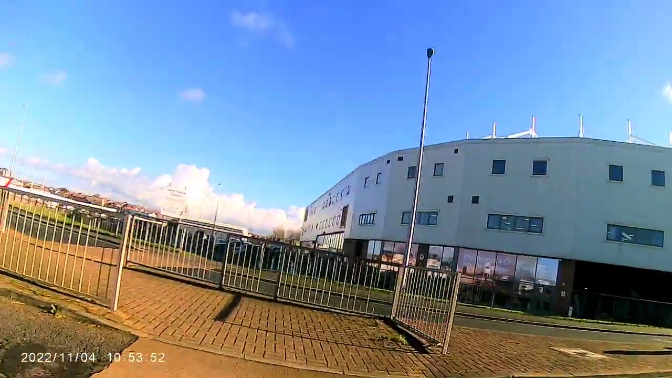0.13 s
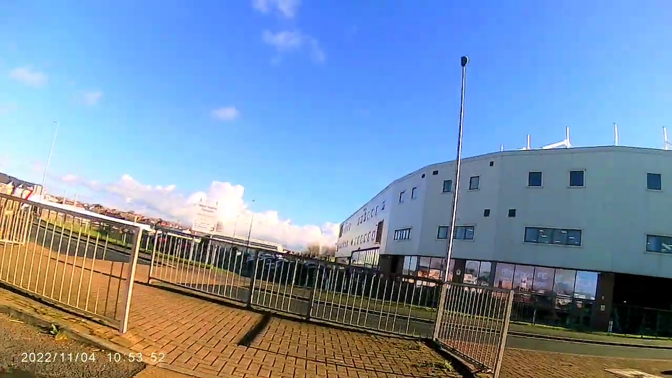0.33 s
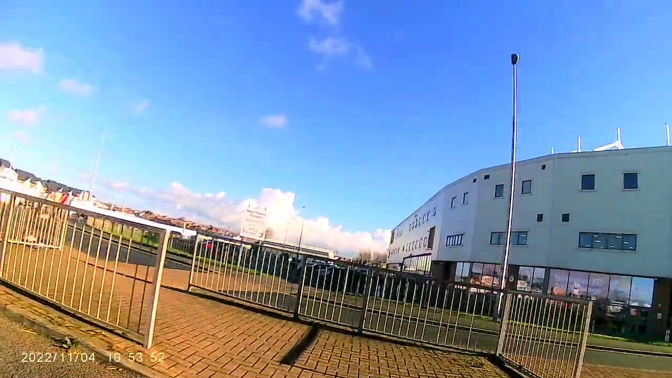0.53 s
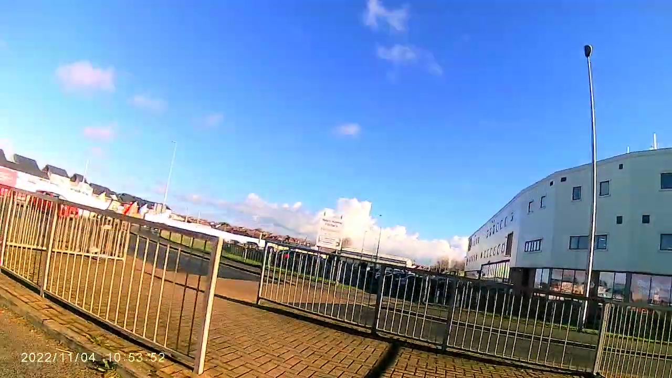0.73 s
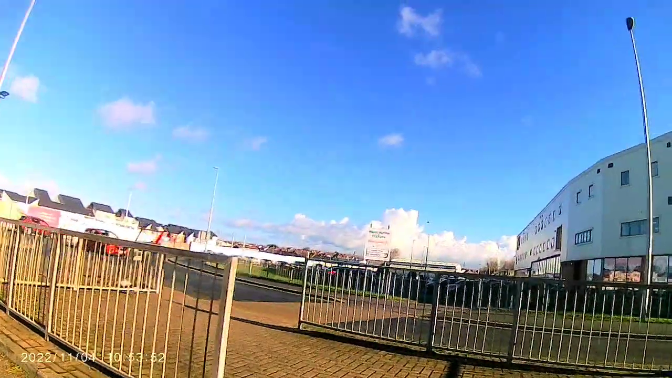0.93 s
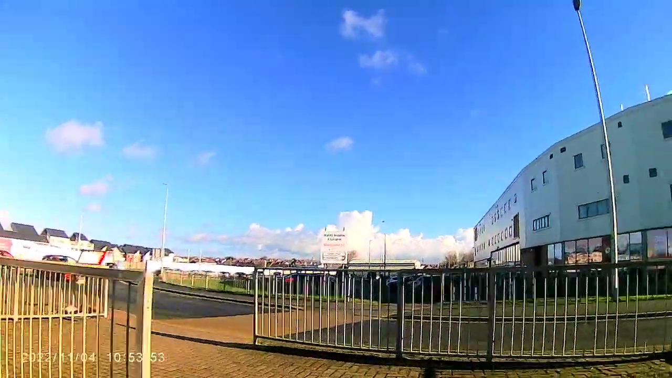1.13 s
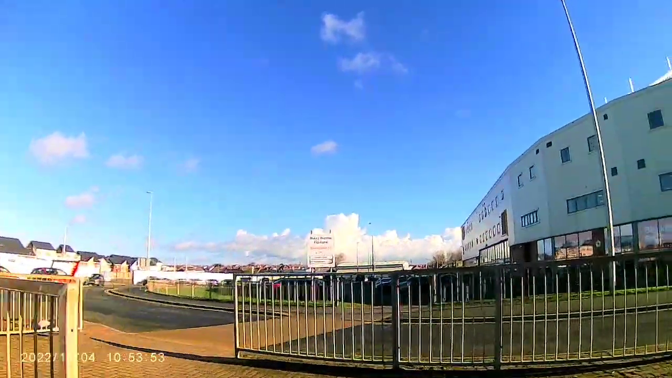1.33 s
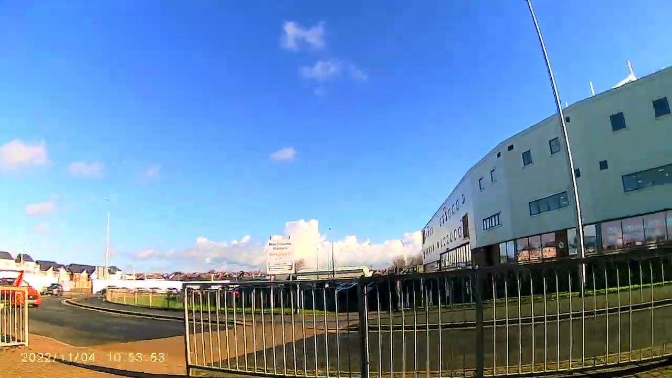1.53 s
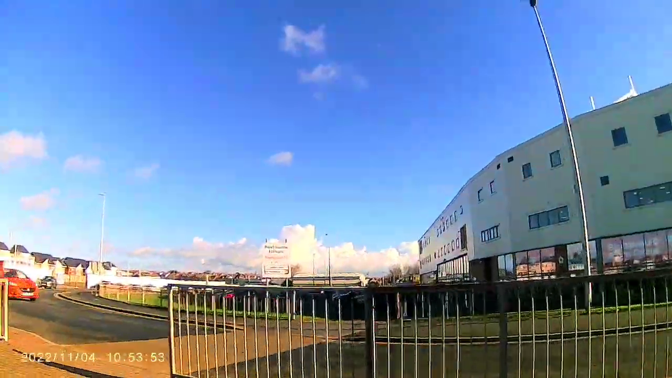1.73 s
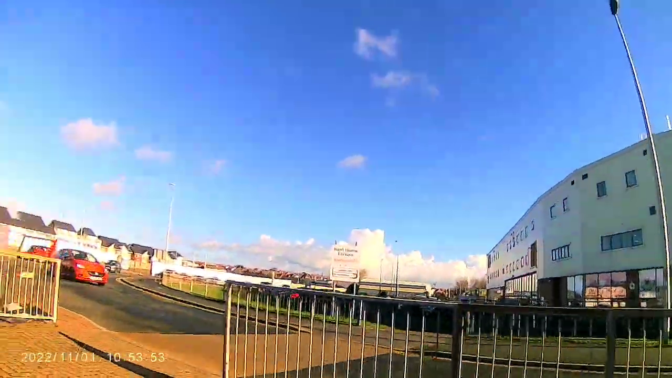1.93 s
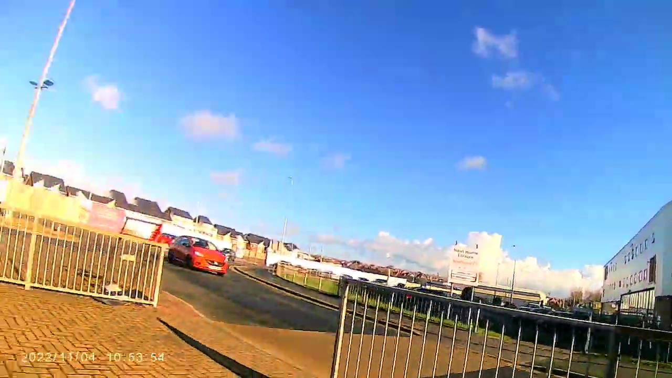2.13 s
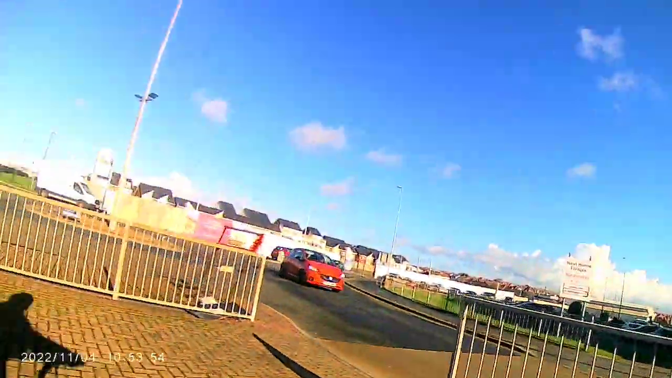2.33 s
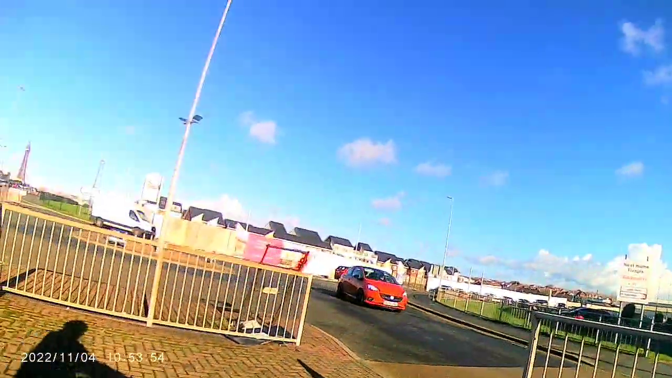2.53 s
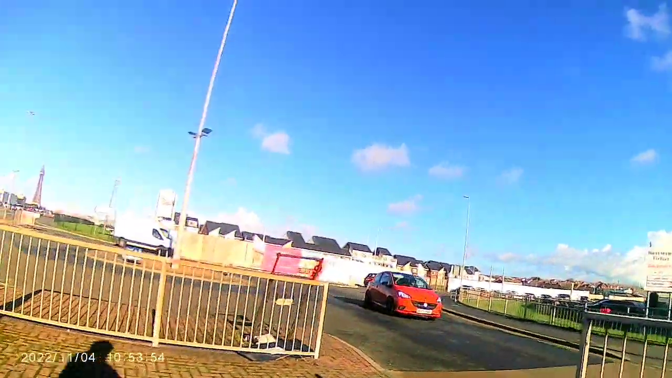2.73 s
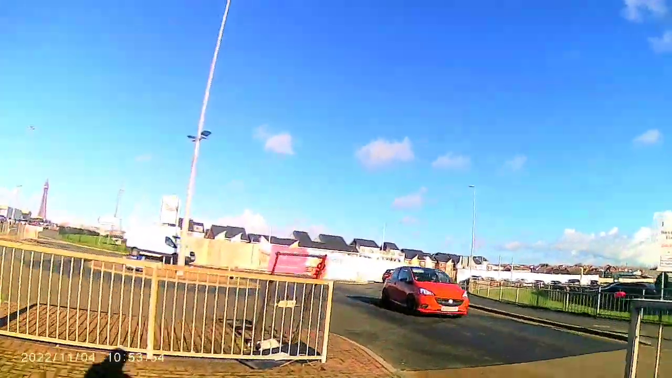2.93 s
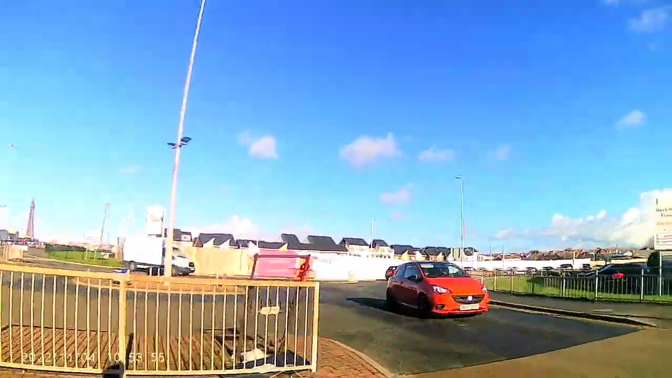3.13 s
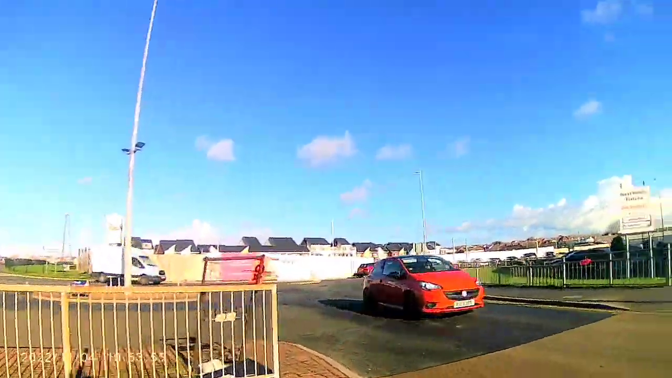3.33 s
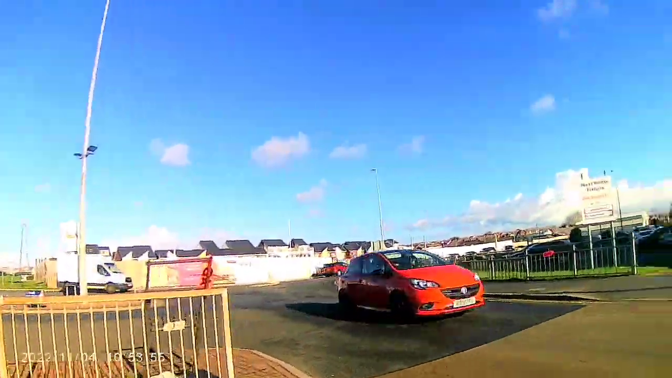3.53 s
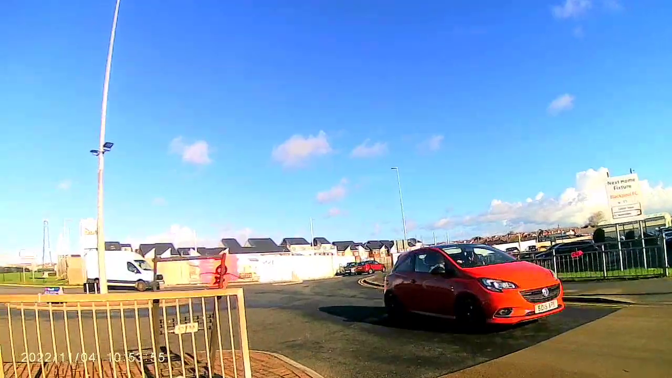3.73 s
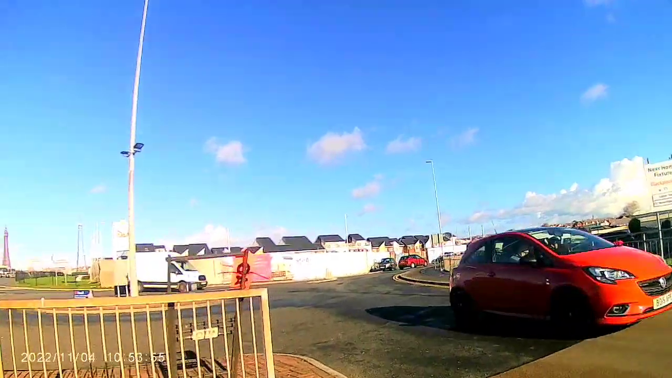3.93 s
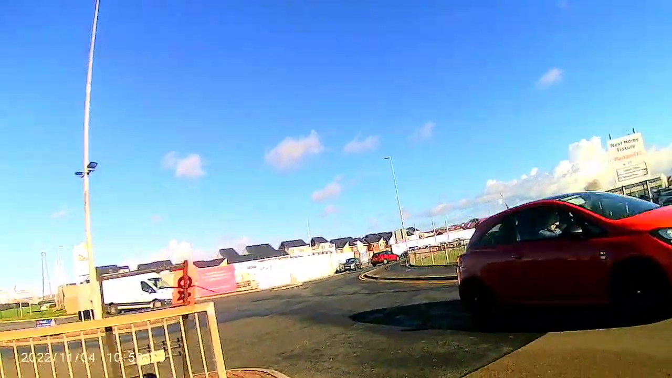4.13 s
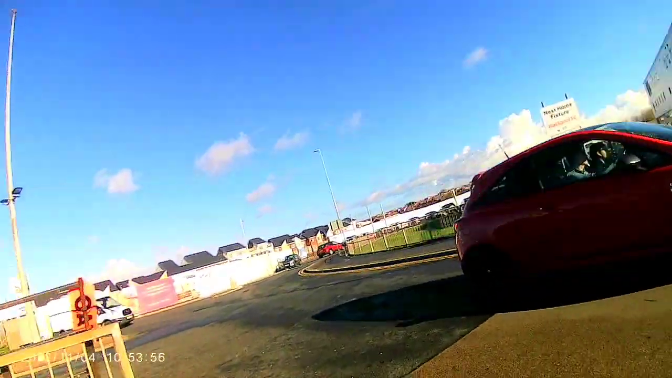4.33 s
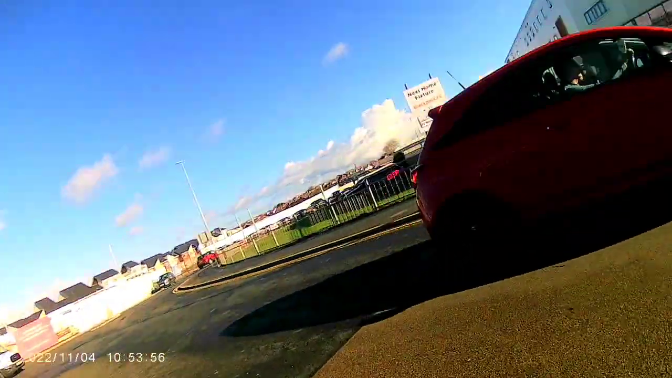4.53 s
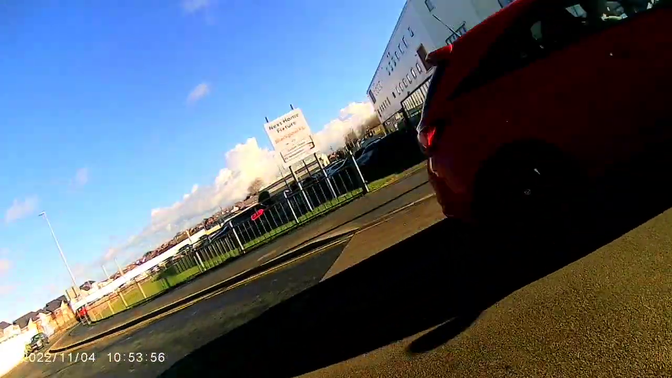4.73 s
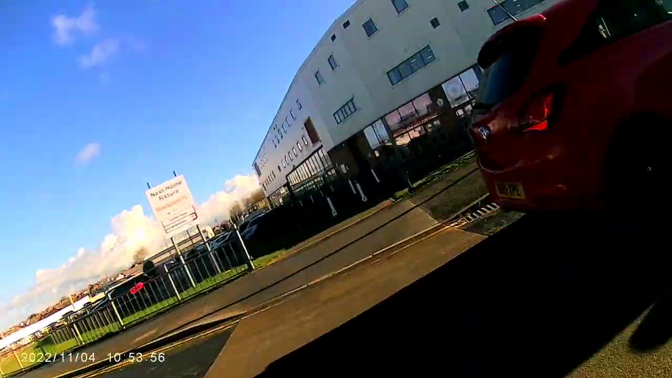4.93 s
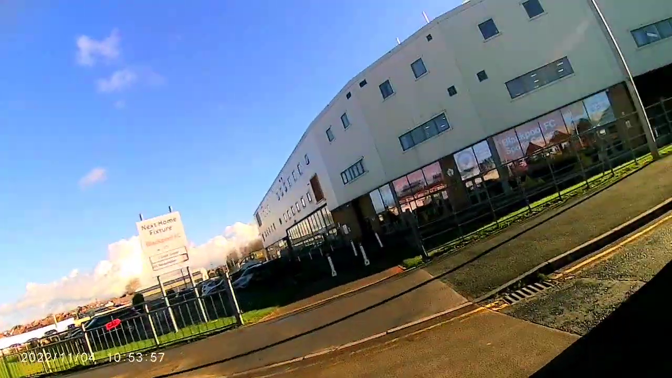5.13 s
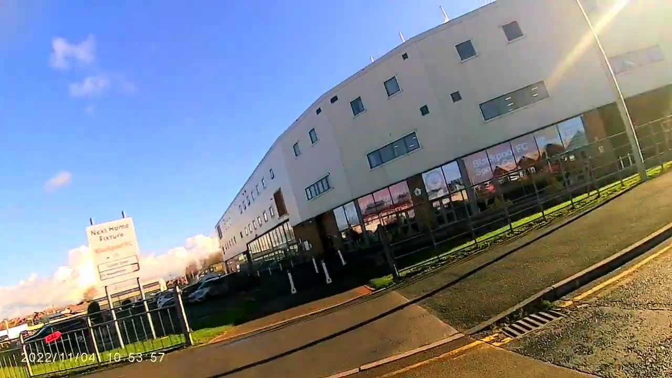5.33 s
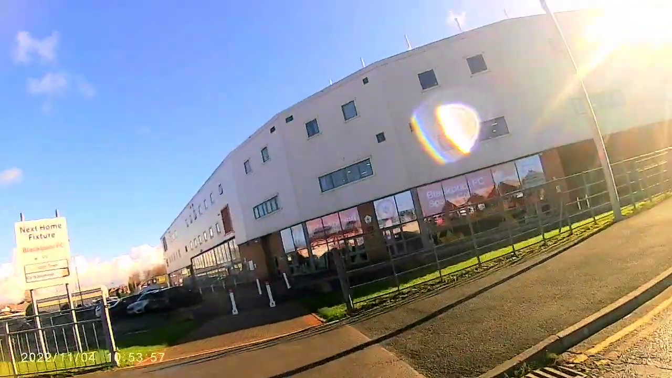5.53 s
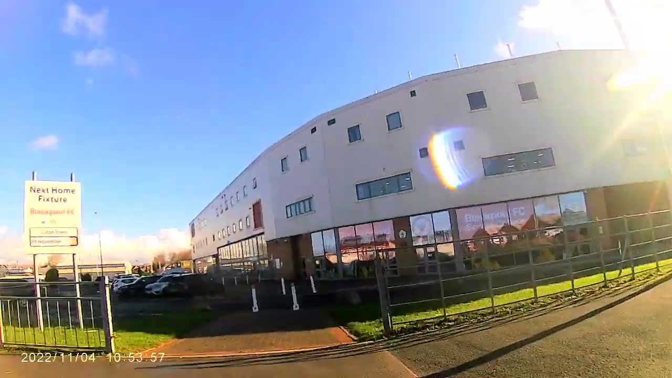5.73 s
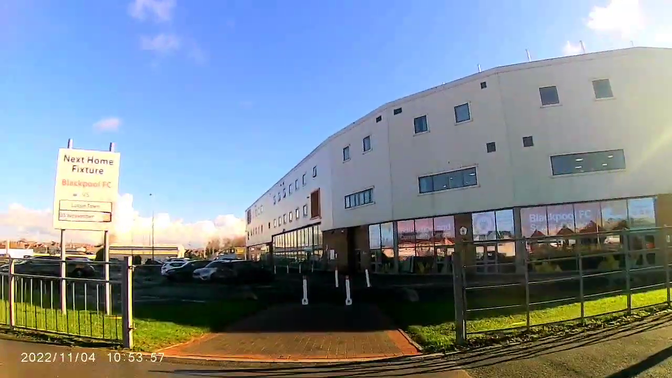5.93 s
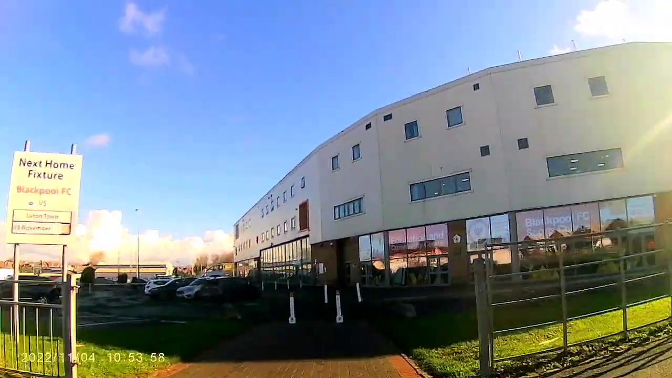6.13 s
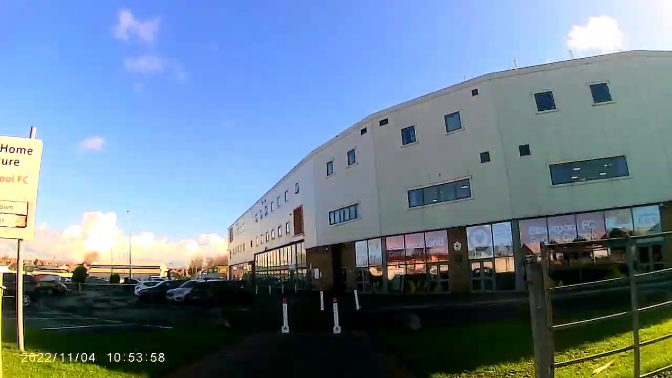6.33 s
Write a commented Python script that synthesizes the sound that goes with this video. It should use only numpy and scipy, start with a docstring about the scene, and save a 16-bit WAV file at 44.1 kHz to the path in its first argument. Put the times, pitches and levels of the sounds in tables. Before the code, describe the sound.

Heard from a cased camera fixed to a small electric scooter on an open street: the motor hums and sinks in pitch to a crawl within a second and a half. A quieter stretch follows, with wind buffets, faint ticks and light knocks. Near four seconds the motor pulls away, its whine climbing, then a rough low hum, growing tyre rumble and hiss, sharp clicks and heavy knocks, harshest at the end.

```python
"""The motor of a small electric vehicle, probably a scooter, whines, winds down to a crawl at a junction,
then pulls away: sine lines locked to speed curves. Filtered noise makes tyre rumble through the frame, hiss and wind.
Gusts and eddies buffet the microphone of a cased camera on the vehicle. Bumps knock the case; a few short crackles
come with wind spikes overloading the microphone: noise bursts through the case's resonances.
A loose part ticks under strong shaking and clicks at set times; distant traffic is steady noise."""
import sys
import numpy as np
from scipy import signal
from scipy.fft import rfft, irfft
from scipy.io import wavfile
from scipy.ndimage import uniform_filter1d

SR = 44100
rng = np.random.default_rng(int(sys.argv[2]) if len(sys.argv) > 2 else 0)


def to_wav(sig):
    """Store sig (one row per channel, or 1-D mono) as 16-bit WAV at the path in sys.argv[1].

    Samples outside -1..1 are clipped; the rate is SR.
    """
    pcm = np.clip(np.atleast_2d(sig), -1, 1) * 32767
    pcm = np.round(pcm).astype(np.int16)
    wavfile.write(sys.argv[1], SR, pcm.T)  # frames by channels


N = 281341
TIME = np.arange(N) / SR

# resonances of the loose plastic part: centre_hz, width_hz, gain_db
LOOSE_PART_MODES = [(3400, 550, 2), (3900, 300, 1.5), (4750, 550, -8), (5900, 600, -12), (6680, 240, -4.5),
                    (7120, 450, -6)]


def from_db(db):
    """Decibels to gain."""
    return 10 ** (np.asarray(db) / 20)


def in_time(rows):
    """Interpolate each column of a curve at every sample."""
    s, *columns = np.transpose(rows)
    return [np.interp(TIME, s, column) for column in columns]


def rms_one(x):
    """Scale to rms 1."""
    return x / np.sqrt(np.mean(x ** 2) + 1e-20)


def evened(x, span_s):
    """Hold the rms near 1 over spans of this length; faster flutter stays."""
    size = max(int(span_s * SR), 8)
    power = uniform_filter1d(uniform_filter1d(x ** 2, size), size)
    return x / np.sqrt(power + 1e-12)


def noise(spectrum):
    """Noise of a given spectrum that falls away beyond its ends, rms 1."""
    hz, db = np.transpose(spectrum)
    f = np.arange(N // 2 + 1) * SR / N + 1e-3
    gain = from_db(np.interp(np.log(f), np.log(hz), db))
    gain = gain * np.minimum(f / hz[0], 1) ** 2 * np.minimum(hz[-1] / f, 1) ** 2
    return rms_one(irfft(rfft(rng.standard_normal(N)) * gain, N))


def drift(rate_hz):
    """Random drift, low-passed at this rate, rms 1."""
    lowpass = signal.butter(2, rate_hz, fs=SR, output="sos")
    settled = signal.sosfilt(lowpass, rng.standard_normal(N + SR))[SR:]
    return rms_one(settled)


def resonate(x, hz, width_hz):
    """One two-pole resonance with gain 1 on top."""
    r = np.exp(-np.pi * width_hz / SR)
    zeros = np.array([1, 0, -1]) * (1 - r * r) / 2
    poles = [1, -2 * r * np.cos(2 * np.pi * hz / SR), r * r]
    return signal.lfilter(zeros, poles, x + 1e-18)


def body(x, modes):
    """Resonances in parallel, signs alternating."""
    return sum((-1) ** k * from_db(db) * resonate(x, hz, width_hz)
               for k, (hz, width_hz, db) in enumerate(modes))


def add(out, s, sound, peak_db):
    """Put a short sound into the mix at a given time and peak level."""
    at = int(s * SR)
    out[at:at + len(sound)] += (from_db(peak_db) * sound / np.abs(sound).max())[:N - at]


def motor_tone(speed, level, orders, rough, wobble, fade_db):
    """Lines locked to a speed curve, at the level curve's last column; pitch and strength shake at random."""
    hz, db = in_time(speed)[0], in_time(level)[-1]
    phase = 2 * np.pi * np.cumsum(hz * (1 + wobble * drift(25))) / SR
    # 5 ms ramps at both ends of the level curve
    sounding = np.clip(np.minimum(TIME - level[0][0], level[-1][0] - TIME) / 0.005, 0, 1)
    lines = 0
    for multiple, line_db in orders:
        strength = from_db(line_db + fade_db * drift(7.2))
        lines = lines + strength * np.sin(multiple * phase) * (1 + rough * drift(29))
    return np.sqrt(2) * from_db(db) * sounding * lines


def motor(rasp_db):
    """Whine, hum and fainter lines follow the motor's speed: winding down, pulling away, running at speed."""
    # whine: time_s, pitch_hz, level_db
    slowing_whine, pulling_whine = [(0.0, 1181, -50.5), (0.13, 1216, -50), (0.3, 1200, -51),
                                    (0.48, 1140, -54), (0.568, 1190, -50), (0.7, 1140, -53),
                                    (0.83, 902, -56), (1.05, 623, -61), (1.12, 520, -43), (1.2, 408, -34),
                                    (1.27, 320, -31), (1.33, 258, -29), (1.39, 203, -24), (1.44, 175, -34)], [(3.801, 240, -45), (3.871, 245.1, -25.5),
                                                     (3.91, 259, -23), (3.96, 244, -19.5),
                                                     (4.063, 253, -19.5), (4.128, 240, -22),
                                                     (4.211, 253, -18.5), (4.3, 288, -19.5),
                                                     (4.401, 335, -26), (4.501, 386, -25.5),
                                                     (4.561, 413, -24.5), (4.678, 472, -42.5),
                                                     (4.854, 522, -37.5), (5.099, 538, -36),
                                                     (5.35, 546.5, -39), (5.722, 572.5, -44),
                                                     (5.972, 621.4, -39)]
    # hum, slowing (one brief break) and at speed: time_s, pitch_hz, level_db
    slowing_hum, fast_hum = [(0.0, 353.2, -19.5), (0.129, 368, -21.5), (0.298, 363, -22.5),
                             (0.498, 339.3, -20), (0.529, 352.7, -37.5), (0.562, 354.8, -13),
                             (0.603, 365.5, -26), (0.729, 339, -20.5), (0.8, 322, -37.5),
                             (0.95, 300, -44.5)], [(4.661, 156.7, -14.5), (4.721, 164.6, -22),
                                                  (4.801, 174.7, -17.5), (4.865, 159.5, -9.5),
                                                  (4.901, 157, -36), (5.228, 159.7, -24),
                                                  (5.33, 156.7, -10), (5.42, 162.1, -12),
                                                  (5.51, 166.9, -9.5), (5.54, 172.8, -31),
                                                  (5.631, 177.8, -12.5), (5.68, 181.5, -29.5),
                                                  (5.77, 188.3, -9), (5.832, 189.2, -19), (5.88, 191.1, -7),
                                                  (5.91, 194.2, -18.5), (5.949, 189.1, -8.5),
                                                  (5.99, 188.1, -32), (6.046, 177.6, -10.5),
                                                  (6.103, 182.9, -9.5), (6.13, 191.5, -36),
                                                  (6.146, 188.4, -6), (6.249, 196.6, -7.5),
                                                  (6.279, 197.5, -19.5), (6.323, 198, -6.5),
                                                  (6.354, 196.6, -29), (6.38, 199.2, -4.5)]
    # lines of whine and hum: pitch_multiple, level_db
    slowing_orders, pulling_orders = [(1, 1.5)], [(1, 3), (2, -44)]
    slowing_hum_orders, fast_hum_orders = [(1, 0.5)], [(1, -1.3), (2, -31.5)]
    # fainter lines below and above the whine, at multiples of its pitch: pitch_multiple, level_db
    slowing_faint_orders, fast_faint_orders = [(0.606, -35), (0.909, -33), (1, -37), (1.37, -46),
                                               (1.515, -39), (1.79, -50)], [(2 / 3, 16), (4 / 3, -3),
                                                                          (5 / 3, -1.8), (2, -0.8),
                                                                          (7 / 3, -4), (8 / 3, -12.5),
                                                                          (2.3, -7)]
    # lines above the whine under the strain of starting: pitch_multiple, level_db
    strain_orders = [(2, -3), (2.5, -6), (3, 0), (4, -8), (5, -8)]
    # levels of the strain lines and of the fainter lines at speed: time_s, level_db
    strain_level, fast_faint_level = [(3.8, -56), (3.92, -47), (4.25, -47), (4.5, -46), (4.75, -49)], [(4.85, -55), (5.3, -56.5), (5.499, -58),
                                                            (5.751, -48), (5.968, -60.5)]
    # whine breaking up as the ride gets faster: time_s, roughness (0-1)
    pulling_roughness = [(4.2, .22), (4.5, .33), (4.7, .55)]
    # rasp spectrum: freq_hz, density_db
    rasp_spectrum = [(400, 0.0051), (1500, 0)]
    # resonances of the motor's shell: centre_hz, width_hz, gain_db
    shell_modes = [(730, 130, 0.5), (1185, 40, -2.5)]

    slowing = motor_tone(slowing_whine, slowing_whine, slowing_orders, rough=0.4, wobble=0.009, fade_db=1.2)
    slowing += motor_tone(slowing_hum, slowing_hum, slowing_hum_orders, rough=0.23, wobble=0.011, fade_db=-0.1)
    slowing += motor_tone(slowing_whine, slowing_hum, slowing_faint_orders, rough=0.6, wobble=0.007, fade_db=2.0)

    rough, = in_time(pulling_roughness)
    pulling = motor_tone(pulling_whine, pulling_whine, pulling_orders,
                         rough=rough, wobble=0.03 * rough, fade_db=1.0)
    strain = motor_tone(pulling_whine, strain_level, strain_orders, rough=0.6, wobble=0.02, fade_db=1.0)
    # strain lines, and a rasp pulsing with them, heard only through the shell
    rasping = strain * (1 + from_db(rasp_db) * noise(rasp_spectrum))
    pulling += body(rasping, shell_modes)

    fast = motor_tone(fast_hum, fast_hum, fast_hum_orders, rough=0.16, wobble=0.02, fade_db=0.4)
    fast += motor_tone(pulling_whine, fast_faint_level, fast_faint_orders, rough=0.6, wobble=0.004, fade_db=2.0)
    return slowing + pulling + fast


def gusting():
    """Strength of the gusts: each swells and fades as a bell."""
    # gusts: peak_s, level_db, length_s (at half height)
    gust_rows = [(0.71, -16, 0.0081), (0.794, -21, 0.16), (1.363, -20.5, 0.053), (2.174, -17, 0.055),
                 (2.653, -20.5, 0.12), (2.91, -20, 0.12), (3.148, -24, 0.076), (3.582, -12.5, 0.062),
                 (3.786, -14, 0.17), (4.104, -15, 0.021), (4.251, -22.5, 0.24), (4.433, -16.5, 0.058),
                 (4.615, -24, 0.038), (5.194, -15.5, 0.046), (6.06, -12.5, 0.1)]
    return sum(from_db(db) * 0.5 ** ((2 * (TIME - s) / length_s) ** 2) for s, db, length_s in gust_rows)


def frame(width_hz, flutter_db):
    """The road and the gusts keep the frame's main resonance ringing: narrow noise on a moving carrier."""
    # drive by the road: time_s, level_db
    road_drive = [(0.0, -32.5), (0.62, -24), (0.88, -22.5), (1.04, -34), (1.15, -20.5), (1.36, -27.5),
                  (1.45, -26.5), (1.53, -30), (1.62, -23), (1.85, -26), (2.2, -27.5), (2.8, -34.5),
                  (3.75, -38), (3.86, -21.5), (4.3, -23.5), (4.78, -22.5), (4.95, -20.5), (5.3, -23),
                  (6.38, -14.5)]
    # main resonance, shifting with the load: time_s, pitch_hz
    frame_pitch = [(0.55, 200), (0.85, 181), (1.3, 177), (1.65, 186), (2.05, 197), (2.5, 188), (3.2, 176),
                   (4.5, 178), (5.0, 198), (6.38, 188)]
    gust_shake_db = -14  # share of a gust that gets into the frame
    road_strength = from_db(in_time(road_drive)[0] + flutter_db * drift(15))
    drive = np.hypot(road_strength, from_db(gust_shake_db) * gusting())
    phase = 2 * np.pi * np.cumsum(in_time(frame_pitch)[0]) / SR
    ringing = drift(width_hz / 2) * np.cos(phase) + drift(width_hz / 2) * np.sin(phase)
    return drive * evened(ringing, span_s=0.048)


def tyres(gain_db, hiss_db, grain_db, hiss_grain_db):
    """Rumble carried through the frame and hiss through the air, both grainy with the paving."""
    # levels before gains, following speed and rough paving: time_s, hiss_level_db, rumble_above_hiss_db
    road_levels = [(0.0, -45, 14), (0.35, -47.5, 15.5), (0.92, -54, 20), (1.76, -58, 13.5),
                   (2.5, -56, 15.5), (2.75, -58.5, 13), (3.0, -63.5, 25), (3.73, -59.5, 17),
                   (3.96, -52, 21.5), (4.89, -46, 18), (5.47, -47.5, 20), (5.74, -45.5, 12.5),
                   (6.13, -40.5, 20), (6.38, -38, 16)]
    # spectra of rumble and hiss: freq_hz, density_db
    rumble_spectrum, hiss_spectrum = [(100, -2.5), (200, 30), (270, 15), (330, 16.5), (420, 16), (520, 6),
                                      (620, -1.5), (800, -17), (1200, -26.5)], [(550, 8.5), (770, 3), (950, -7), (1200, -1),
                                                             (1450, -3), (1720, -1.5), (1950, -16),
                                                             (2150, -11.5), (2400, -13), (3100, -11.5),
                                                             (3500, -18.5), (4500, -28.5), (6000, -32)]
    level_db, rumble_db = in_time(road_levels)
    paving = drift(24)
    rumble_gain = from_db(level_db + rumble_db + gain_db + grain_db * paving)
    rumble = rumble_gain * evened(noise(rumble_spectrum), span_s=0.085)
    hiss_gain = from_db(level_db + hiss_db + hiss_grain_db * (paving + drift(56)))
    hiss = hiss_gain * noise(hiss_spectrum)
    return rumble, hiss


def wind(gain_db, lump_db):
    """Lumpy turbulence on the microphone that swells in gusts."""
    # steady wind before gain: time_s, level_db
    steady_wind = [(0.0, -23.5), (0.55, -29), (0.9, -30.5), (1.1, -29.5), (1.95, -24.5), (2.5, -26),
                   (3.0, -20.5), (3.48, -23), (3.95, -18.5), (4.5, -18), (4.8, -24.5), (6.38, -25)]
    # turbulence spectrum: freq_hz, density_db
    wind_spectrum = [(10, 11), (22, -2.5), (45, -3.5), (80, -9), (130, -9.5), (200, -20.5), (400, -39),
                     (900, -77)]
    strength = np.hypot(from_db(in_time(steady_wind)[0]), gusting())
    lumpy = noise(wind_spectrum) * from_db(lump_db * drift(34))
    return from_db(gain_db) * strength * evened(lumpy, span_s=0.046)


def street(level_db):
    """Distant traffic: steady shaped noise."""
    # traffic spectrum: freq_hz, density_db
    street_spectrum = [(100, 12.5), (700, 0.5), (1100, 4), (1400, -34), (1620, 9.5), (2000, -6.5),
                       (3100, -9.5), (4500, -24.5), (6000, -28.5), (6700, -5.5), (7500, -31.5),
                       (8300, -40.5), (10000, -46.5)]
    return from_db(level_db) * noise(street_spectrum)


def buzz(shaking, gain_db, growth, bright_hz, creep_db):
    """The loose part ticks at swings strong enough to lift it, only a little harder for stronger ones."""
    # loose part: time_s, tick_level_db (before gain), lift_threshold_db (before creep)
    looseness = [(0, -45, -15), (0.7, -44, -15), (0.9, -43, -19), (2.5, -46, -20), (3.6, -45, -17.5),
                 (4.1, -40, -12.5), (4.8, -43, -11), (5.4, -41.5, -13), (6.15, -35.5, -9)]
    tick_db, lift_db = in_time(looseness)
    # the part creeps in its seat, so it buzzes in fits
    excess = shaking / from_db(lift_db + creep_db * drift(18))
    at = signal.find_peaks(excess, height=1, distance=SR // 300)[0]
    strength = from_db(tick_db + gain_db + 2 * rng.standard_normal(N))
    ticks = np.zeros(N)
    ticks[at] = strength[at] * excess[at] ** growth
    single_ring = body(signal.unit_impulse(SR // 100), LOOSE_PART_MODES)
    ring = body(ticks, LOOSE_PART_MODES) / np.abs(single_ring).max()
    # so small a part radiates no lows
    return signal.sosfilt(signal.butter(4, bright_hz, "high", fs=SR, output="sos"), ring)


def knocks_and_crackles(gain_db, chatter_s, longer_db, tail, crack, detune, thud_db, thud_hz, thud_width_hz):
    """Bumps knock the case; a few short crackles come with wind spikes overloading the microphone."""
    # knocks and crackles, levels before gains: start_s, burst_level_db, thud_level_db, cutoff_hz
    knock_rows = [(0.418, -43, -18, 1200), (0.475, -40.5, -26, 1790), (0.575, -31.5, -24, 1400),
                  (0.816, -37.5, -32, 1500), (0.981, -31.5, -24.5, 1300), (1.416, -39, -30.5, 1420),
                  (1.944, -35.5, -32.5, 1400), (2.785, -42, -54, 2200), (2.843, -39, -32.5, 800),
                  (2.928, -35.5, -23.5, 700), (2.95, -38.5, -36, 1500), (3.228, -33, -32, 1600),
                  (3.382, -32.5, -42.5, 1350), (3.599, -38.5, -36, 1510), (3.832, -36, -26, 1300),
                  (3.992, -15, -15.5, 720), (4.12, -41, -35, 700), (4.149, -30.5, -41, 650),
                  (4.2, -23, -22.5, 1170), (4.277, -41, -29, 588), (4.686, -27, -24.5, 1200),
                  (4.776, -23, -21, 1410), (4.787, -22.5, -18, 2380), (4.924, -33, -22.5, 900),
                  (5.029, -31, -19, 1340), (5.06, -33.5, -19.5, 1300), (5.114, -18.5, -12.5, 1900),
                  (5.191, -33.5, -25, 1407), (5.995, -31, -32, 1500), (6.011, -23, -19, 2000),
                  (6.047, -22, -27, 1700), (6.059, -26, -18, 1700), (6.094, -34, -18, 700),
                  (6.155, -6, 0, 3020), (6.232, -16, -8.5, 1197), (6.25, -18, -14, 1497),
                  (6.299, -29, -20.5, 1390), (6.312, -20, -12.5, 950)]
    # resonances of the case: centre_hz, width_hz, gain_db
    case_modes = [(660, 60, 11), (940, 150, 0), (1190, 130, 4), (1580, 110, 6), (1710, 110, 6.5),
                  (1980, 450, 4), (2150, 70, -8), (2520, 200, 1.5), (3070, 160, -5), (3530, 250, -10),
                  (4040, 460, -18)]
    crack_hz, crack_width_hz = 900, 3300  # broad, unpitched part
    chatter_hz = 348  # mean pulse rate
    out, t = np.zeros(N), TIME[:SR // 8]
    thud = resonate(signal.unit_impulse(len(t)), thud_hz, thud_width_hz)
    thud = resonate(thud, thud_hz, thud_width_hz)
    for (s, db, low_db, cutoff_hz), grit in zip(knock_rows, rng.standard_normal((len(knock_rows), len(t)))):
        pulses = 0.3 + np.cos(np.pi * chatter_hz * rng.uniform(0.75, 1.25) * t) ** 4
        # louder bursts last longer
        age = t / (chatter_s * 2 ** (db / longer_db))
        chatter = grit * pulses * (np.exp(-age ** 2) + tail * np.exp(-age / 2))
        # a low cutoff keeps the burst from the upper resonances
        soften = signal.butter(2, cutoff_hz, fs=SR, output="sos")
        burst = signal.sosfilt(soften, chatter)
        # the case sits a little differently each time, which shifts its resonances
        modes = [(hz * (1 + detune * rng.uniform(-1, 1)), width_hz, mode_db)
                 for hz, width_hz, mode_db in case_modes]
        ringing = body(burst, modes) + crack * resonate(burst, crack_hz, crack_width_hz)
        add(out, s, ringing, db + gain_db)
        add(out, s, thud, low_db + thud_db)
    return out


def puffs(gain_db, rebound):
    """An eddy hits the port: the diaphragm is pushed in, then swings back more slowly."""
    # eddies: peak_s, level_db (before gain), width_s (at half height)
    eddies = [(0.665, -12, .004), (0.691, -13, .003), (0.785, -8, .014), (0.831, -9, .012),
              (2.18, -10, .004), (2.723, -11, .012), (2.95, -7, .013), (3.108, -12, .004),
              (3.149, -12, .004), (3.559, -5, .004), (3.577, -8, .006), (3.599, -6.5, .011),
              (4.1205, -5, .0035), (4.152, -4, .004), (4.212, -6, .006), (4.255, -7, .003),
              (4.28, -4, .006), (4.371, -9, .004), (4.417, -8, .003), (4.44, -8, .003), (4.569, -9, .003),
              (4.63, -8, .004), (5.186, -3.5, .0035), (5.302, -7, .0025), (5.465, -11, .003),
              (6.032, -10, .004)]
    out = np.zeros(N)
    for s, db, width_s in eddies:
        u = np.arange(int(10 * width_s * SR)) / (width_s * SR) - 2  # time from the top, in widths
        push = 0.5 ** ((2 * u) ** 2)
        swing_back = rebound * 0.5 ** ((u - 2) ** 2)
        add(out, s - 2 * width_s, push - swing_back, db + gain_db)
    return out


def jolts(swell_s):
    """Heavy jolts make the whole frame swing for a few cycles, swelling and dying away."""
    # jolts: start_s, peak_db, pitch_hz
    jolt_rows = [(0.682, -9, 150), (2.176, -15, 185), (3.556, -16, 125), (4.42, -9, 145), (4.565, -13, 135)]
    out, t = np.zeros(N), TIME[:SR // 6]
    for s, db, hz in jolt_rows:
        add(out, s, t * np.exp(-t / swell_s) * np.sin(2 * np.pi * hz * t), db)
    return out


def ticks_and_clicks(gain_db, snap_s, bare, vary_db):
    """Ticks and clicks of the loose part, from faint buzzing ticks to hard snaps: a noise snap and its ring."""
    # ticks and clicks: start_s, level_db (before gain)
    click_rows = [(1.414, -37), (1.439, -33.5), (1.757, -43), (1.892, -42.5), (1.939, -39), (2.091, -42),
                  (2.146, -44), (2.176, -49), (2.25, -45.5), (2.3, -39.5), (2.358, -42.5), (2.493, -42),
                  (2.712, -43), (2.828, -39), (2.887, -42), (3.0937, -39), (3.237, -42), (3.3778, -44),
                  (3.391, -44), (3.418, -41), (3.468, -36), (3.568, -43), (4.671, -40), (4.688, -22.5),
                  (4.7217, -21.5), (4.7673, -31), (4.7831, -34), (4.789, -30), (4.7955, -26.5),
                  (4.8053, -16), (4.8473, -32), (4.854, -29), (4.861, -37), (5.076, -29), (5.6268, -21.5),
                  (5.7734, -26.5), (5.9243, -32), (5.9745, -23), (5.9969, -16.5), (6.031, -30),
                  (6.0653, -15), (6.099, -32), (6.1558, -12), (6.1575, -11), (6.2443, -15.5), (6.3066, -20),
                  (6.33, -20), (6.365, -20)]
    out, t = np.zeros(N), TIME[:SR // 20]
    for (s, db), grit in zip(click_rows, rng.standard_normal((len(click_rows), len(t)))):
        snap = grit * np.exp(-t / snap_s)
        # the balance of the ring differs each time
        modes = [(hz, width_hz, mode_db + vary_db * rng.standard_normal())
                 for hz, width_hz, mode_db in LOOSE_PART_MODES]
        add(out, s, body(snap, modes) + bare * resonate(snap, 6000, 2000), db + gain_db)
    return out


def housing(x):
    """Cavities of the camera housing lift some pitches and swallow others."""
    # peaks and dips, applied in series: centre_hz, width_hz, gain_db
    housing_modes = [(581.6, 160, -9), (1045, 120, -2.5), (1588, 43, 4.5), (2170, 60, 7), (2205, 180, -6),
                     (2764, 290, -9), (4600, 70, 9)]
    for hz, width_hz, db in housing_modes:
        x = x + (from_db(db) - 1) * resonate(x, hz, width_hz)
    return x


def scene():
    """Motor, frame, jolts and rumble also drive the buzz; wind and distant traffic lie around them."""
    rumble, hiss = tyres(gain_db=4.0, hiss_db=2.7, grain_db=2.0, hiss_grain_db=2.5)
    shaking = motor(rasp_db=3.0) + frame(width_hz=38, flutter_db=2.5) + jolts(swell_s=0.011) + rumble
    air = wind(gain_db=1.0, lump_db=1.0) + puffs(gain_db=2.5, rebound=0.21)
    bursts = knocks_and_crackles(gain_db=2.5, chatter_s=0.0105, longer_db=36, tail=0.1, crack=0.4, detune=0.03,
                                 thud_db=3.0, thud_hz=430, thud_width_hz=110)
    rattle = buzz(shaking, gain_db=-2.5, growth=0.4, bright_hz=2400, creep_db=1.6)
    rattle += ticks_and_clicks(gain_db=-3.0, snap_s=0.001, bare=0.5, vary_db=2.5)
    return (shaking + hiss + air + bursts + rattle + street(level_db=-59.5))[None]


def record(dry):
    """Housing colour, microphone low-pass, soft limiting of the loudest swings, two more low-passes."""
    microphone_top_hz, dull_hz, cutoff_hz = 7700, 9300, 16000
    top, knee = 0.71, 16  # limit amplitude; higher knee = harder bend
    heard = signal.sosfilt(signal.butter(12, microphone_top_hz, fs=SR, output="sos"), housing(dry))
    flattened = heard / (1 + np.abs(heard / top) ** knee) ** (1 / knee)
    dulled = signal.sosfilt(signal.butter(3, dull_hz, fs=SR, output="sos"), flattened)
    return signal.sosfilt(signal.butter(14, cutoff_hz, fs=SR, output="sos"), dulled)


dry = scene()
out = record(dry)
to_wav(out)
```